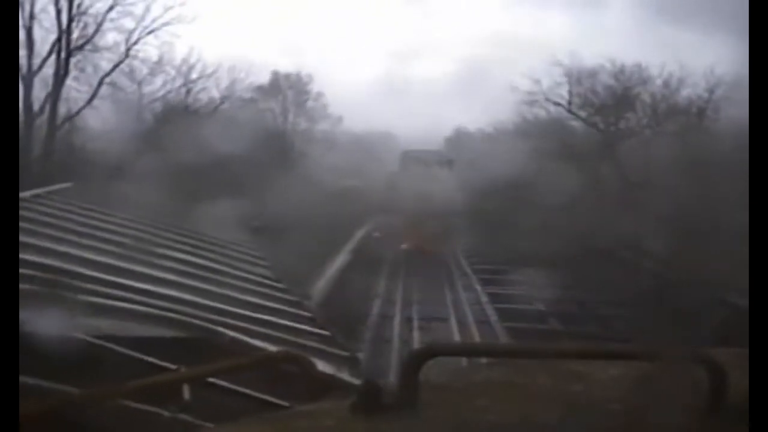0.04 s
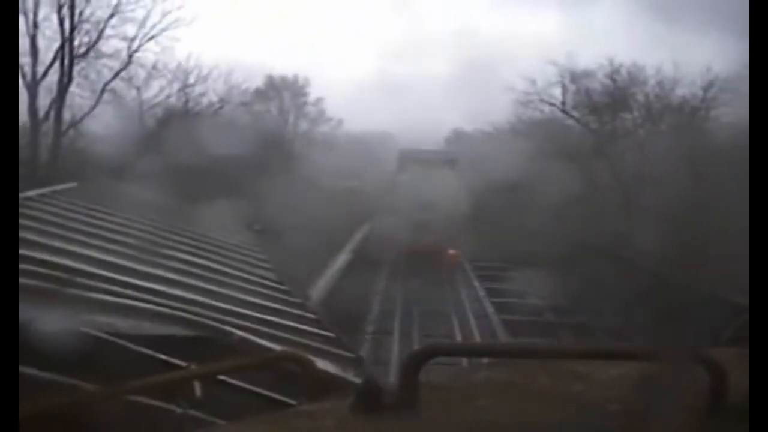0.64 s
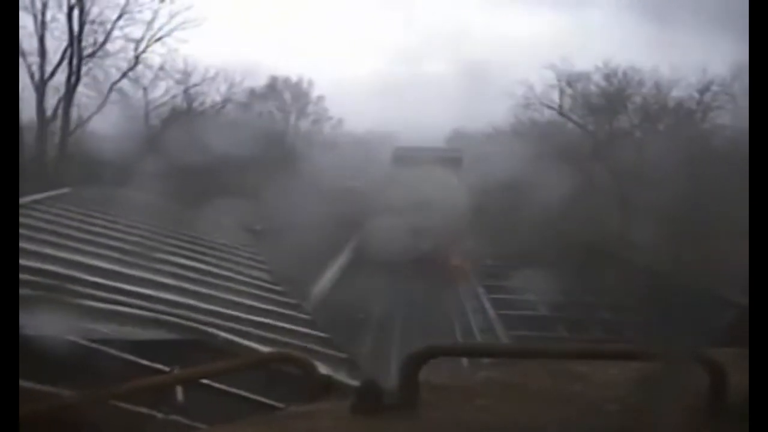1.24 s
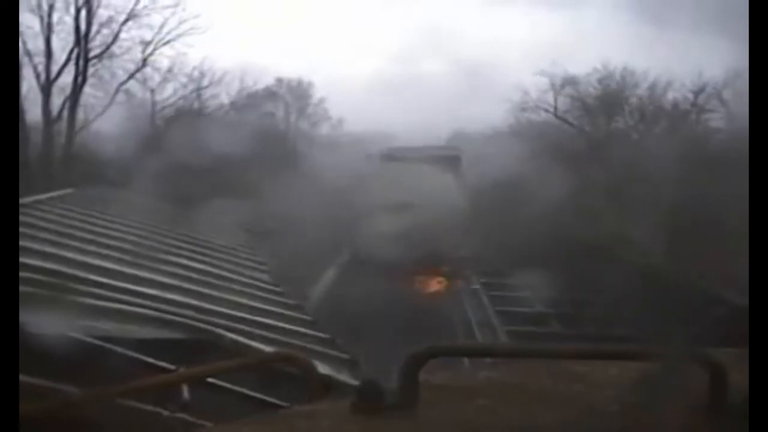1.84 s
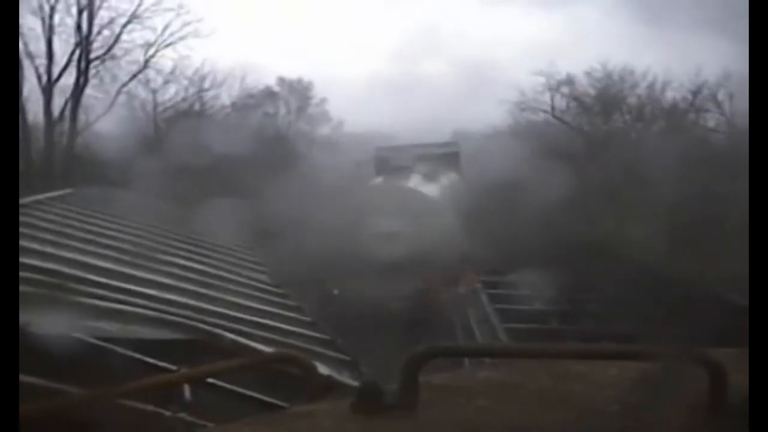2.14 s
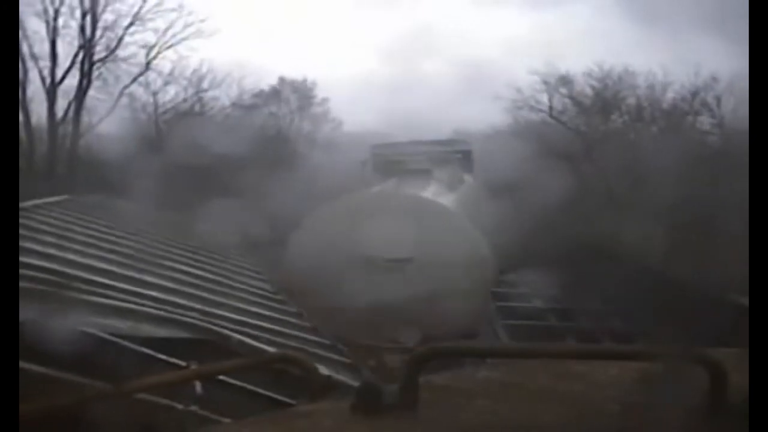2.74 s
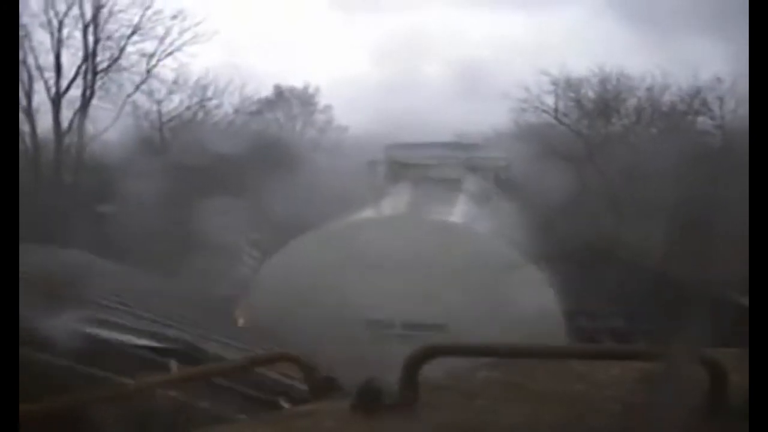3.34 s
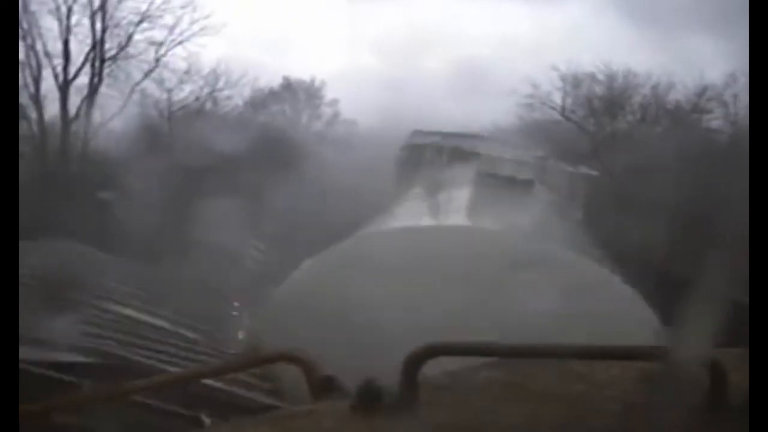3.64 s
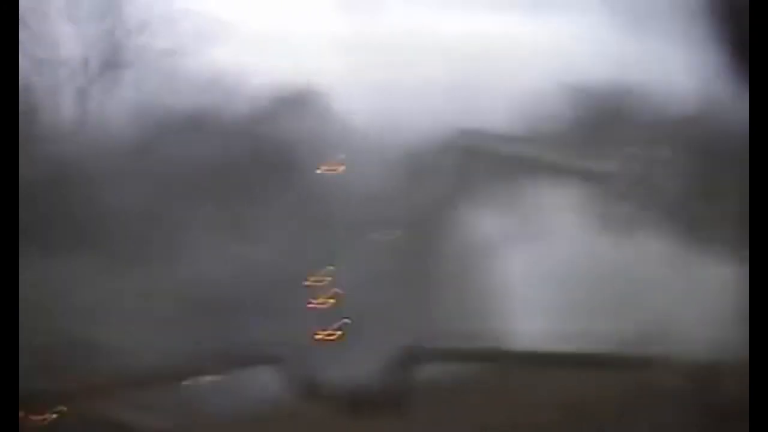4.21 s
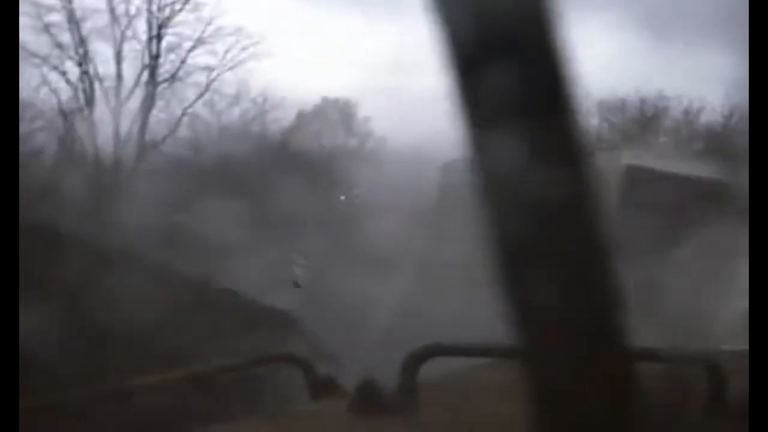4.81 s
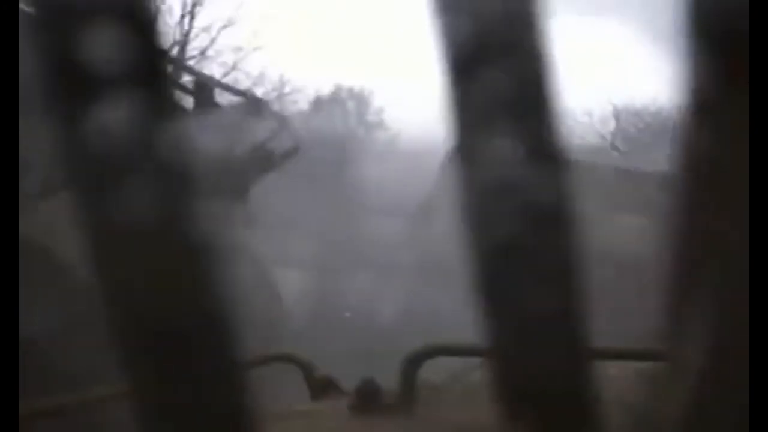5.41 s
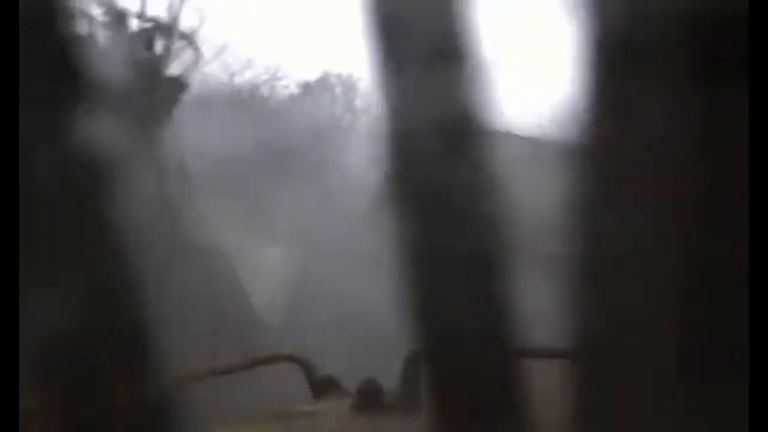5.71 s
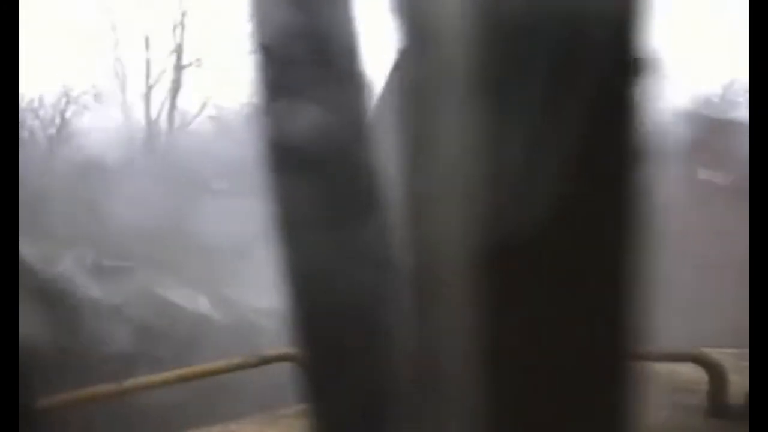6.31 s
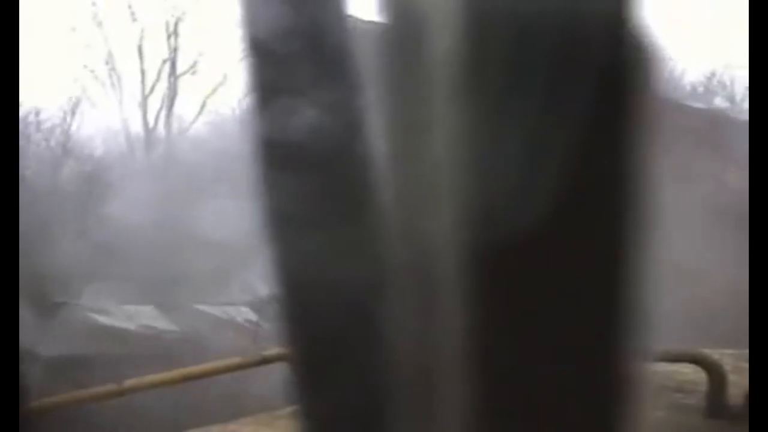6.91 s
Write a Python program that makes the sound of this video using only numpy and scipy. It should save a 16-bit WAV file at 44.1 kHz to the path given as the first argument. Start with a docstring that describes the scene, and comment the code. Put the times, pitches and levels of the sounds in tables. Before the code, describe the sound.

A locomotive's low drone builds into a loud, distorted boom with crumpling, grinding steel as it hits a derailed tank car.

```python
"""A derailed tank car slams into a moving locomotive, heard from the cab. The body booms, steel
crumples and grinds, with brief tones, bangs of debris and sharp bursts of crackle. Underneath,
the engine drones and the wheels hiss. The cab recorder overloads: it squares off the boom, which
chops the grinding into a crackle, and its coarse sampling adds a gritty top."""
import sys
import numpy as np
from scipy import signal
from scipy.fft import rfft, irfft, next_fast_len
from scipy.io import wavfile
from scipy.ndimage import uniform_filter1d

SR = 44100
rng = np.random.default_rng(int(sys.argv[2]) if len(sys.argv) > 2 else 0)


def dump_mix(stems):
    """Bounce the given channels to the path in sys.argv[1] as a 16-bit WAV at rate SR."""
    frames = np.atleast_2d(stems).T  # one column per channel
    limited = np.clip(frames, -1, 1)  # hard clip at full scale
    pcm = np.round(limited * 32767).astype(np.int16)
    wavfile.write(sys.argv[1], SR, pcm)


N = 306495

# Shove and scrape of the wreck. Each row: time in seconds, boom level in dB, grinding level in dB.
CONTACT_LEVELS = [(2.2, -66, -65), (2.48, -24, -52), (2.56, -17.5, -28.5), (2.93, -13, -29), (3.1, -8, -26),
                  (3.48, -9, -17), (3.68, 7, -12), (3.85, 1, -13), (4.06, 0.5, -13), (4.34, 1.5, -21.5),
                  (4.54, -5, -18.5), (4.72, 3.5, -22), (5.05, 0.5, -22.5), (5.3, -5, -32.5),
                  (5.86, -1.5, -29.5), (6.0, -11.5, -32), (6.3, -2.5, -34.5), (6.6, -14, -29.5),
                  (6.8, -14, -44)]
# Cars lurch together, plates buckle. Each row: start in seconds, length in seconds, rise in dB.
LURCHES = [(2.476, 0.082, 10), (2.567, 0.084, 5), (2.987, .17, 8), (3.203, 0.1, 5), (3.532, .13, 3.5),
           (3.888, 0.088, 7), (3.976, 0.16, 8), (4.138, 0.11, 4.5), (4.413, 0.1091, 5), (4.659, .13, 4),
           (5.491, .25, 13), (5.73, 0.1295, 7), (6.221, 0.269, 6)]
# The frame sways, its boom drops to a shudder. Each row: time in seconds, heave rise in dB.
SWAYS = [(3.82, 7), (4.36, 4.5), (5.25, 4.924), (5.46, 4.94)]
# Short sharp bursts: crackle at 4.368 and 4.381 s, elsewhere debris on the frame.
# Each row: start in seconds, relative level in dB.
BURSTS = [(2.499, -23.5), (2.522, -24), (2.58, -19), (2.6, -17), (3.066, -11.5), (3.457, -13), (3.602, -4),
          (3.624, -9), (3.764, -8), (3.909, 0), (3.938, -6.5), (4.06, -15), (4.09, -9), (4.182, -2),
          (4.21, -19), (4.298, -7), (4.368, -2), (4.381, -12), (4.46, -20), (4.705, -17), (4.833, -8.5),
          (4.848, -13.5), (4.955, -13), (5.01, -4.5), (5.605, -14), (5.893, -19.5), (6.329, -23)]
# Brief tones: a narrow one near 1.8 kHz at 4.2 s, elsewhere groans and squeals of sliding steel.
# Each row: start and length in seconds, pitch and width in Hz, level in dB.
TONES = [(0.857, 0.61, 296, 28, -34), (2.28, 0.07, 598, 88, -28.5), (2.279, 0.088, 867, 44, -32),
         (2.28, 0.059, 1494, 720, -39), (2.241, 0.23, 151.9, 127, -22.5), (2.427, 0.69, 160.5, 27.4, -14.5),
         (2.608, 0.5, 544, 29, -30.5), (2.852, 0.7, 133, 26, -9), (3.54, 0.092, 2655, 30, -30),
         (4.2, .04, 1803, 34, -19.5), (4.457, 0.055, 1938, 15, -24), (4.452, 0.055, 2700, 31.7, -19),
         (6.199, 0.97, 290.8, 32.9, -29), (6.815, 0.071, 2560, 170, -32.5)]
# Rough track. Each row: time in seconds, drone rise in dB.
TRACK_THUMPS = [(.05, 4.7), (.25, 4), (.72, 1.7), (1.86, 3)]
# Wheel hiss. Each row: time in seconds, level in dB.
WHEEL_LEVELS = [(0.0, -36), (0.2, -35), (0.7, -40.5), (1.1, -41), (1.5, -37), (2.0, -41.5), (2.3, -39)]
# Noise spectra of the sources. Each row: frequency in Hz, relative density in dB.
CRUMPLE_SPECTRUM = [(20, 6.5), (40, 1), (160, 3.5), (300, 3), (550, -8.5), (900, -14), (1300, -20),
                    (3000, -28)]
GRIND_SPECTRUM = [(200, -54), (500, -5), (1000, 4.5), (1250, -8), (1700, -1.5), (2100, -3), (2650, -0.5),
                  (3400, -1.5), (4500, -3.5), (7000, -0.5)]
BURST_SPECTRUM = [(100, -59), (250, 31), (600, 12.5), (1200, 8.5), (1650, 13.5), (2100, 3), (2600, 12.5),
                  (3500, 10.5), (6000, -10)]
ENGINE_SPECTRUM = [(18, -0.5), (30, 6), (42, 4), (52, -16), (67, 6.5), (85, -2.5), (104, 0), (122, -7),
                   (135, -7), (152, -12), (230, -20), (305, -23), (450, -33), (1200, -53)]
WHEEL_SPECTRUM = [(250, 2), (550, 1), (750, -1), (900, -0.5), (1080, 0.5), (1300, -14.5), (1600, -2.5),
                  (2050, -5.5), (2650, 1.5), (3200, -3.5), (3900, -5), (6000, -52)]

TIME_S = np.arange(N) / SR


def boom(shove_db, jolt_db, contact_s=2.5, contact_hz=84.62, sag_hz_per_s=5):
    """The body booms over the frame's heave; pitch rises in jolts, dips in sways, sinks over time."""
    sway_db = swells(SWAYS, width_s=.05)
    pitch_hz = contact_hz - sag_hz_per_s * (TIME_S - contact_s) + 2.5 * jolt_db - 3 * sway_db
    body = resonance(pitch_hz, width_hz=43.3)
    heave = from_db(-11 + sway_db) * resonance(hz=29.94, width_hz=12.5)
    swing = cut(body + heave, order=2, hz=28.4, kind="high")  # the frame's slowest swing
    level_db = .5 + shove_db + 0.57 * jolt_db + 0.76 * drift(10)
    return from_db(level_db) * steady(swing, span_s=0.019, share=0.66)


def crumpling(shove_db, scrape_db, jolt_db, slip):
    """Plates crumple under shove and scrape together."""
    level_db = 1.05 + .45 * shove_db + 0.65 * scrape_db + 1.25 * jolt_db + 1.37 * slip
    return from_db(level_db) * noise(CRUMPLE_SPECTRUM)


def grinding(scrape_db, jolt_db, slip):
    """The tank grinds along the plates in uneven slips."""
    force = from_db(2.26 * slip) + cracks()
    return from_db(-2.4 + scrape_db + .4 * jolt_db) * force * noise(GRIND_SPECTRUM)


def cracks(rate_per_s=17, t60_s=0.055):
    """Fragments crack off: random spikes of force, many small, a few large."""
    sizes = from_db(-2.5 + np.minimum(rng.exponential(1, N), 3))
    onsets = rng.random(N) < rate_per_s / SR
    decay = from_db(-60 / (t60_s * SR))
    return signal.lfilter([1], [1, -decay], sizes * onsets + 1e-18)


def jolts(roundness=.8):
    """Extra force in dB: each lurch builds and lets go in a rounded arch."""
    rise_db = np.zeros(N)
    for start_s, length_s, peak_db in LURCHES:
        rise_db += peak_db * arch(start_s, length_s) ** roundness
    return rise_db


def bursts(gain_db=3, attack_s=0.00085, t60_s=0.099):
    """Sharp bangs and crackle: dense noise, fast rise, exponential decay."""
    envelope = np.zeros(N)
    for start_s, level_db in BURSTS:
        start = int(start_s * SR)
        age_s = TIME_S[start:start + SR] - TIME_S[start]
        attack = 1 - np.exp(-age_s / attack_s)
        envelope[start:start + SR] += attack * from_db(gain_db + level_db - 60 * age_s / t60_s)
    return envelope * noise(BURST_SPECTRUM)


def brief_tones():
    """Each tone is one wavering resonance that swells and fades."""
    out = np.zeros(N)
    for start_s, length_s, hz, width_hz, level_db in TONES:
        out += from_db(level_db) * arch(start_s, length_s) * resonance(hz, width_hz)
    return out


def engine():
    """Throbbing drone that swells into thumps over rough track."""
    level_db = -16.5 + 1.24 * drift(17) + swells(TRACK_THUMPS, width_s=0.039)
    return from_db(level_db) * steady(noise(ENGINE_SPECTRUM), span_s=0.038, share=0.86)


def wheels():
    """Wavering hiss of rolling wheels, with a thin whine."""
    level_db, = curves(WHEEL_LEVELS)
    hiss = from_db(level_db + 1.5 * drift(18)) * noise(WHEEL_SPECTRUM)
    whine = from_db(-59.5) * resonance(hz=2630, width_hz=6.6)
    return hiss + whine


def coarse_sampling(x, rate_hz=8000, error_db=-26.5, oversample=8):
    """Held samples mirror the sound around their rate; rounding error grows with sample size."""
    samples = np.interp(np.arange(0, N / SR, 1 / rate_hz), TIME_S, x)
    samples *= 1 + from_db(error_db) * rng.standard_normal(len(samples))
    fine_time_s = np.arange(oversample * N) / (oversample * SR)
    held = samples[(fine_time_s * rate_hz).astype(int)]
    return held.reshape(N, oversample).mean(axis=1)


def recorder_hiss(x, follow_s=0.013):
    """Wide hiss that follows the treble of x."""
    treble = cut(x, order=2, hz=1910, kind="high")
    treble_rms = np.sqrt(np.abs(uniform_filter1d(treble ** 2, int(follow_s * SR))))
    return from_db(-8) * treble_rms * cut(rng.standard_normal(N), order=1, hz=2440, kind="high")


def resonance(hz, width_hz):
    """Randomly shaken mode: strength and phase wander; rms 1."""
    phase = 2 * np.pi * np.cumsum(hz + np.zeros(N)) / SR
    return rms_one(drift(width_hz) * np.cos(phase) + drift(width_hz) * np.sin(phase))


def noise(spectrum):
    """Noise of a given spectrum; rms 1."""
    hz, db = np.transpose(spectrum)
    size = next_fast_len(N)
    bins_hz = np.arange(size // 2 + 1) * SR / size + 1e-3
    gain = from_db(np.interp(np.log(bins_hz), np.log(hz), db, left=-120, right=-120))
    return rms_one(irfft(rfft(rng.standard_normal(N), size) * gain, size)[:N])


def drift(rate_hz, hop=40, run_in=2000):
    """Slow random wander: noise through a double one-pole low-pass; rms 1."""
    pole = np.exp(-2 * np.pi * hop * rate_hz / SR)
    white = rng.standard_normal(N // hop + run_in + 2)
    slow = signal.lfilter([1], [1, -2 * pole, pole * pole], white)[run_in:]
    return np.interp(np.arange(N) / hop, np.arange(len(slow)), rms_one(slow))


def steady(x, span_s, share):
    """Even out a share of the chance swells in a noise; rms 1."""
    size = int(span_s * SR)
    power = uniform_filter1d(uniform_filter1d(x ** 2, size), size)
    return rms_one(x / (np.abs(power) + 1e-9) ** (share / 2))


def arch(start_s, length_s):
    """Half-sine envelope."""
    return np.maximum(np.sin(np.pi * np.clip((TIME_S - start_s) / length_s, 0, 1)), 0)


def swells(rows, width_s):
    """Gaussian rise in dB around each time."""
    return sum(rise_db * np.exp(-((TIME_S - at_s) / width_s) ** 2) for at_s, rise_db in rows)


def curves(rows):
    """Each level column, interpolated to every sample."""
    times_s, *columns = np.transpose(rows)
    return [np.interp(TIME_S, times_s, column) for column in columns]


def saturate(x, top):
    """Linear when small, flat at the top."""
    return x / (1 + (x / top) ** 6) ** (1 / 6)


def cut(x, order, hz, kind):
    """Butterworth low- or high-pass."""
    return signal.sosfilt(signal.butter(order, hz, kind, fs=SR, output="sos"), x)


def from_db(db):
    """Decibels to gain."""
    return 10 ** (np.asarray(db) / 20)


def rms_one(x):
    """Scale to unit power."""
    return x / np.sqrt(np.mean(x ** 2) + 1e-20)


def scene():
    """Wreck and locomotive at one microphone in the cab."""
    shove_db, scrape_db = curves(CONTACT_LEVELS)
    jolt_db = jolts()
    slip = drift(rate_hz=23)
    wreck = boom(shove_db, jolt_db)
    wreck += crumpling(shove_db, scrape_db, jolt_db, slip)
    wreck += grinding(scrape_db, jolt_db, slip)
    return (wreck + bursts() + brief_tones() + engine() + wheels())[None]


def record(dry):
    """Cab recorder: the input saturates, then coarse sampling adds grit and hiss."""
    clipped = saturate(dry[0], top=0.67)
    sagging = cut(clipped, order=1, hz=62, kind="high")  # coupling capacitor: flat tops sag
    narrow = cut(sagging, order=4, hz=3880, kind="low")
    stepped = coarse_sampling(narrow)
    bright = stepped + from_db(-15.5) * cut(stepped, order=1, hz=11100, kind="high")
    limited = saturate(bright + recorder_hiss(narrow), top=.94)
    cutoff_hz = 15100
    low_pass = signal.ellip(12, .1, 90, cutoff_hz, fs=SR, output="sos")
    return signal.sosfilt(low_pass, limited)[None]


dry = scene()
out = record(dry)
dump_mix(out)
```